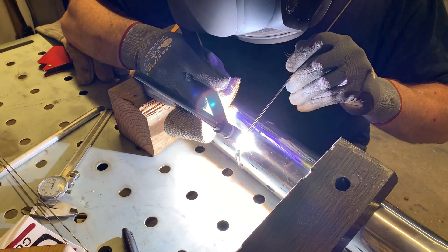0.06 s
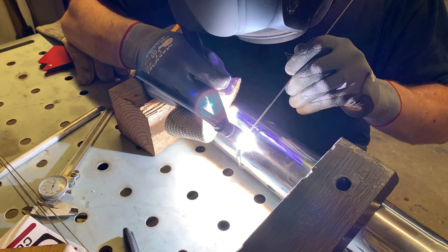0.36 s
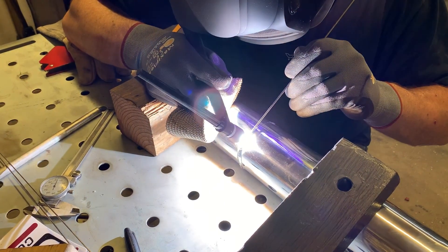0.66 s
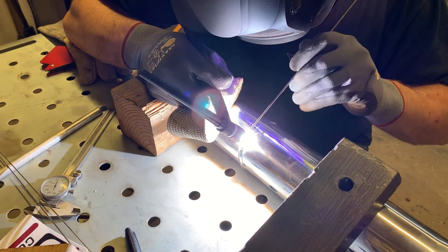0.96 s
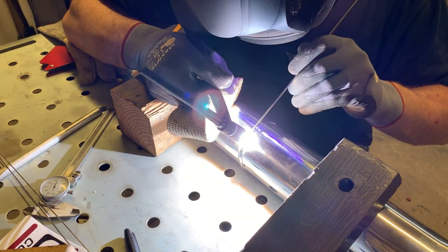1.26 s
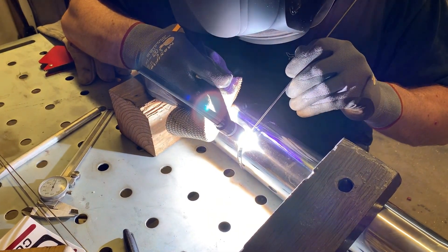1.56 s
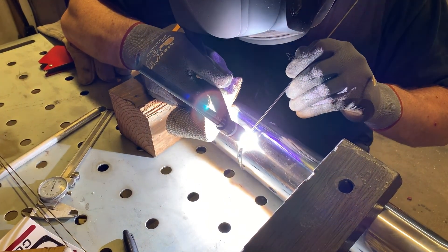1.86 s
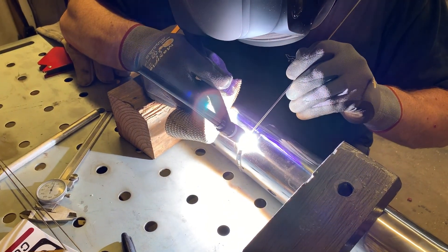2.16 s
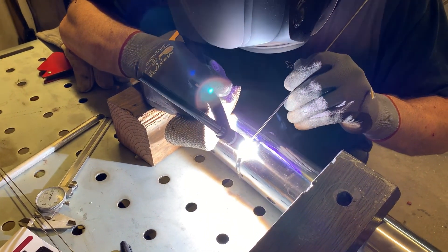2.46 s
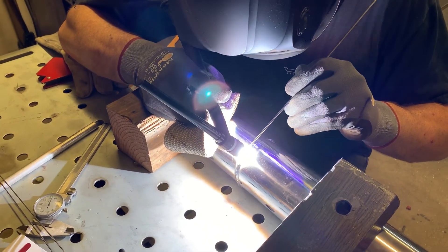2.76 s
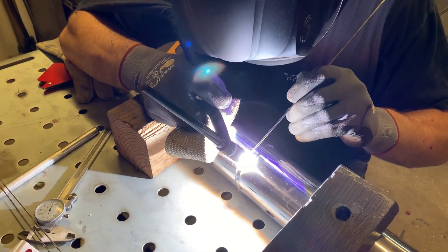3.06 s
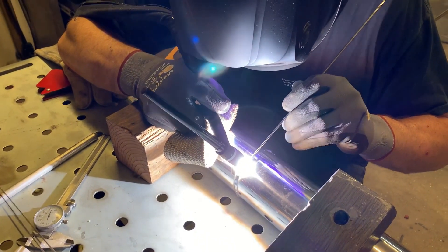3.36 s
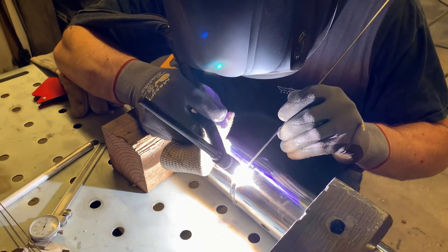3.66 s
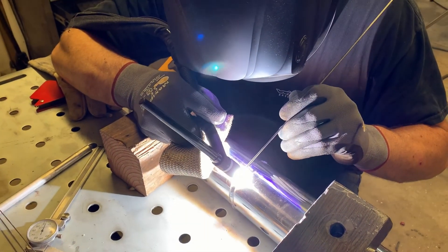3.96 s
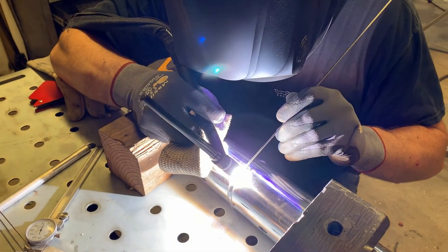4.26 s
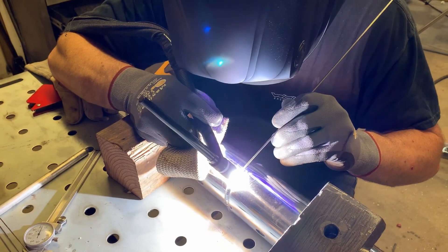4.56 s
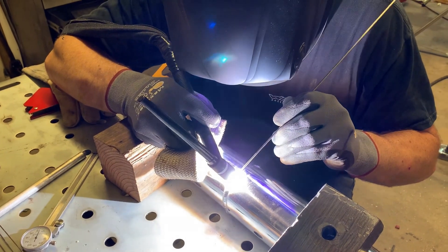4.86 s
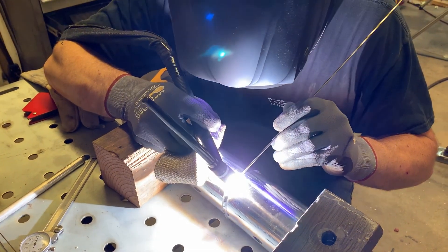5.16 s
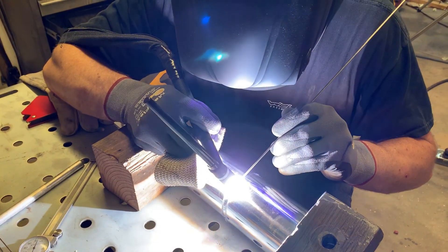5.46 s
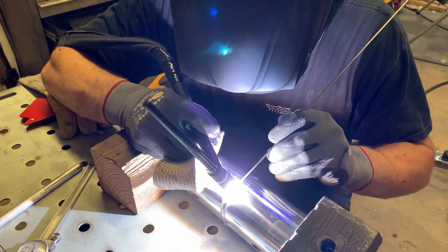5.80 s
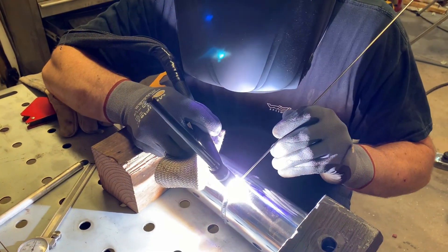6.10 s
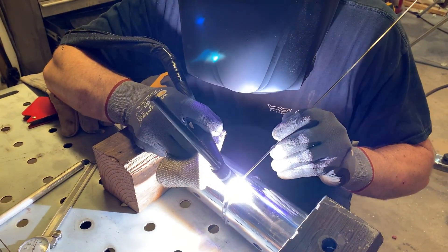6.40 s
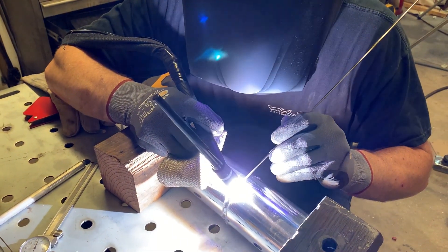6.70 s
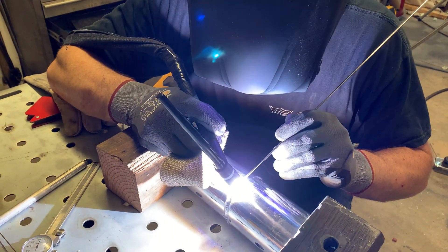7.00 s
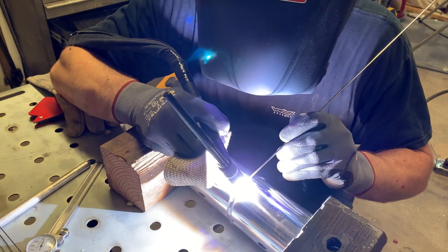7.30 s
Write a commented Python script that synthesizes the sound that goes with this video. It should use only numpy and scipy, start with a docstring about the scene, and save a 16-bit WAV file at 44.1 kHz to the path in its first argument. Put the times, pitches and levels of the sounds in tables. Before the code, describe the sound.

An electric welding arc burns on a metal tube from start to finish, heard close up in a workshop with very little echo. It is a steady-pitched, bright buzz made of very rapid tiny cracks, with a high sizzle on top and a faint gas hiss beneath. The buzz softens briefly about once a second as a filler rod is dabbed in, and gives an occasional sharper spit. Short, low thumps that drop in pitch sputter at about 0.8 seconds, most strongly around 1.5, then in clusters near 2.3 and from 2.9 to 3.3 seconds. From about 4.6 seconds the arc turns smoother and a little softer, losing its raspy edge while the high sizzle stays. At about 6.7 seconds the rasp returns with another cluster of thumps lasting until 7 seconds. One more small thump comes around 7.5 seconds, with the arc still buzzing.

```python
"""At a steel bench in a workshop, an AC TIG arc burns on a metal tube close to a hand-held phone.
The arc re-ignites on every half cycle of the mains: each ignition is a sharp crack, and their periodic
train is heard as a buzz. It softens about once a second as the filler rod is dabbed in. Some ignitions
bring a low thump that falls in pitch. Bench, helmet and workshop reflect the cracks, and shielding gas
hisses underneath."""
import sys
import numpy as np
from scipy import signal
from scipy.fft import rfft, irfft, next_fast_len
from scipy.io import wavfile
from scipy.ndimage import uniform_filter1d

SR = 44100
rng = np.random.default_rng(int(sys.argv[2]) if len(sys.argv) > 2 else 0)


def bounce(signal):
    """Save signal as a 16-bit WAV file at the path given by the first command-line argument."""
    frames = np.transpose(np.atleast_2d(signal))
    limited = np.clip(frames, -1, 1)
    pcm = np.round(limited * 32767).astype(np.int16)
    wavfile.write(sys.argv[1], SR, pcm)


N = 332514
IGNITION_HZ, FIRST_IGNITION_S = 119.878, .00731  # two ignitions per mains cycle

# Broad spectrum of one crack. Each row: frequency in Hz, relative level in dB.
CRACK_SPECTRUM = [(300, -42.5), (2900, -12.5), (3600, -14), (4000, -3.5), (5400, -23), (6200, -9.5),
                  (8300, -4.5), (9400, -4), (10700, 1), (12000, -3.5), (13000, 3), (13600, -2), (14400, -4),
                  (15600, -3.5)]
# Resonances of the gap between cup and tube. Each row: time in seconds, lower rasp resonance in dB
# relative to the upper, sizzle frequency in Hz, relative sizzle level in dB.
GAP_RESONANCES = [(0, -25, 11460, 4), (1.4, -20.5, 11250, -1), (2.1, -19, 10580, 5), (2.8, -4, 10050, 5.5),
                  (3.7, 0, 9980, 4), (5.2, 8.5, 9960, 8), (6.5, 6, 9920, 4), (7.5, 4.5, 10000, 4.5)]
# Drift of the arc along the seam. Each row: time in seconds, then relative levels in dB of the
# treble, of its 4 kHz edge and of its 7 kHz rasp.
ARC_DRIFT = [(0, -27.5, -5.5, -9), (.5, -26, -4.5, -7.5), (1.45, -25, -4, -9), (1.8, -28.5, -4, -7),
             (2.4, -28, -3.5, -8.5), (3.3, -25, -7.5, -12), (3.45, -26.5, -9.5, -9), (3.9, -26, -10.5, -10),
             (4.52, -30, -10, -12), (4.6, -29, -21, -18.5), (5.6, -28.5, -16, -24), (6.58, -25.5, -20, -27),
             (6.7, -27.5, -10, -11.5), (7.54, -25, -21, -10.5)]
# Dabs of the filler rod. Each row: start in seconds, time in the pool in seconds, dip in dB.
ROD_DABS = [(.575, 0.1, 6), (1.52, 0.19, 6), (2.415, .16, 3), (3.365, .13, 4), (3.54, 0.15, 3.5),
            (4.36, 0.11, 1.5), (4.55, 0.075, 3.5), (5.61, 0.14, 3.5), (6.615, 0.048, 3.5),
            (6.84, 0.065, 1.5)]
# Single ignitions that spit. Each row: time in seconds, change of level in dB.
ARC_SPITS = [(.758, -5), (1.717, 5), (3.528, 1.5), (4.062, 3), (4.246, 0), (4.329, 3.5), (4.637, 3),
             (4.663, 5.5), (5.663, 7.5), (5.763, 3.5)]
# Travel of the torch. Each row: time in seconds, position from 0 to 1, buzz gain in dB.
TORCH_TRAVEL = [(0, 0.07, 2.5), (1.4, 0.09, 3), (2.2, 0.2, 2.5), (3.3, 0.2, 2), (3.6, 0.24, -0.5),
                (4.5, 0.2, -2), (4.62, 0.86, -1), (6.6, 1, -4.5), (6.72, 0.86, 0), (7.5, 0.86, 2)]
# Low harmonics of the ignition rate. Each row: harmonic number, relative level in dB at torch
# position 0, the same at position 1.
BUZZ_HARMONICS = [(1, -67, -72), (2, -70.5, -75), (3, -56, -61), (4, -59.5, -55.5), (5, -54, -67.5),
                  (6, -46.5, -59), (7, -51.5, -47), (8, -56.5, -56.5), (9, -43.5, -51), (10, -58.5, -68),
                  (11, -49, -49.5), (12, -56.5, -58.5), (13, -62.5, -55), (14, -82, -51.5),
                  (15, -43.5, -41.5), (16, -43.5, -47.5), (17, -95, -71), (18, -48.5, -47.5),
                  (19, -50.5, -49), (21, -52.5, -51.5), (22, -90, -47), (23, -85, -37.5), (25, -36, -82),
                  (26, -49.5, -36), (27, -65, -46), (29, -31, -33.5), (30, -37, -39)]
# Sputters, a thump outwards and often one back. Each row: time in seconds, relative level in dB,
# half cycles until the rebound (0 for none).
ARC_SPUTTERS = [(.8, 4.5, 1), (.825, -2, 0), (1.217, -8, 0), (1.35, -10, 0), (1.392, -18, 0), (1.5, 5, 1),
                (1.517, 7.5, 1), (1.55, 12, 2), (1.726, -18, 0), (2.251, -12, 3), (2.31, -4.5, 1),
                (2.326, -2.5, 0), (2.351, -3, 1), (2.385, 0, 1), (2.401, 1, 0), (2.477, -22, 0),
                (2.893, -7.5, 2), (2.944, -17, 0), (3.102, -7.5, 1), (3.16, 1.5, 1), (3.185, -4, 0),
                (3.21, -8, 0), (3.311, -11.5, 3), (4.513, -23, 0), (6.689, 5.5, 2), (6.756, 5, 0),
                (6.773, -10, 1), (6.806, 6.5, 0), (6.906, -1, 0), (7.014, -12, 5), (7.49, -5.5, 2)]
# Spectrum of one thump. Each row: frequency in Hz, relative level in dB.
THUMP_SPECTRUM = [(15, -28), (35, -19), (50, -1.5), (68, 0.5), (95, -4.5), (125, -6.5), (170, -7.5),
                  (290, -21), (430, -12.5), (650, -21.5), (1000, -26.5), (2000, -29), (4000, -48),
                  (8000, -50)]
# Group delay of a thump. Each row: frequency in Hz, arrival in milliseconds.
THUMP_GROUP_DELAY = [(30, 18.9), (65, 22.5), (100, 12.2), (140, 7.9), (200, 5.9), (300, 3.65), (500, 1.94),
                     (900, 0.072), (3000, 0.1)]
# Reflections from tube, bench and helmet. Each row: nominal delay in milliseconds, amplitude ratio.
NEAR_REFLECTIONS = [(0.202, 0.19), (0.559, 0.11), (1.1, 0.023), (2.5, 0.33)]
# Shielding gas and workshop air. Each row: frequency in Hz, relative spectral density in dB.
AIR_SPECTRUM = [(20, -118), (38, -101), (58, -85), (100, -100), (200, -92.5), (450, -94), (900, -94.5),
                (1900, -90.5), (2600, -86.5), (4000, -84.5), (7000, -85), (10000, -85), (15500, -112)]
# Phase between the phone's microphone ports. Each row: frequency in Hz, lead of the left in radians.
PORT_PHASE = [(0, 0), (70, .3), (150, 1.1), (280, 1.7), (500, 1.4), (720, .9), (1100, .7), (2400, .7),
              (2800, 2.2), (3600, 2.2), (4200, 1), (6000, 0), (22050, -20.6)]


def cracks(times, scatter_db=1.14, jitter_us=2, fizz=0.29, fizz_ms=1.0, gain_db=29.0, size=512):
    """Source and filter: each ignition, a click with a short fizz, excites the gap under the cup."""
    hz, lead = bins(size), size // 8
    jitter, scatter, rasp_scatter = rng.standard_normal((len(times), 3)).T
    treble_db, edge_db, rasp_db = arc_levels(times)
    lower_db, sizzle_hz, sizzle_db = curve(GAP_RESONANCES, times)
    position, _ = curve(TORCH_TRAVEL, times)
    rasp_db = rasp_db + 8 + 0.74 * rasp_scatter
    power = (undb(over_pitch(CRACK_SPECTRUM, hz)) ** 2
             + resonance(hz, 4230 - 300 * position, 730, edge_db + 8)
             + resonance(hz, 6390, 980, rasp_db + lower_db)
             + resonance(hz, 7270, 1300, rasp_db)
             + resonance(hz, sizzle_hz, 1190, sizzle_db))
    # the click falls between samples, and never quite on time
    late_s = times * SR % 1 / SR + jitter_us * jitter / 1e6
    click = np.exp(-2j * np.pi * hz * late_s[:, None])
    fade = np.exp(-np.arange(size) / SR * 1000 / fizz_ms)
    burst = fizz * rfft(rng.standard_normal((len(times), size)) * fade / np.linalg.norm(fade))
    spectra = (click + burst) * np.sqrt(power) * reflection_comb(times, hz)
    pulses = np.roll(irfft(spectra), lead, axis=1)
    strength = undb(treble_db + gain_db + scatter_db * scatter + per_ignition(ARC_SPITS, times))
    return place(times - lead / SR, pulses * strength[:, None])


def arc_levels(times, attack_s=0.023, release_s=0.033):
    """Damping: the rod lowers the drifting arc's level while in the pool. Gives treble, edge and rasp."""
    treble_db, edge_db, rasp_db = curve(ARC_DRIFT, times)
    for start, hold_s, depth_db in ROD_DABS:
        entering = (times - start) / attack_s
        leaving = 1 - (times - start - hold_s) / release_s
        treble_db = treble_db - depth_db * np.clip(np.minimum(entering, leaving), 0, 1)
    return treble_db, edge_db, rasp_db


def resonance(hz, centre_hz, width_hz, peak_db):
    """A resonator's power response falls with detuning from its centre; one row per ignition."""
    detuning = 2 * (hz - np.reshape(centre_hz, (-1, 1))) / width_hz
    return undb(peak_db)[:, None] ** 2 / (1 + detuning ** 2) ** 2


def buzz(smear_hz=2300, waver_db=1.57, follow_hz=5000, reference_db=-11.5):
    """Fourier series: the periodic arc radiates harmonics; the higher ones follow its strength more."""
    t = np.arange(N) / SR
    position, torch_db = curve(TORCH_TRAVEL, t)
    treble_db, _, _ = arc_levels(t)
    tone = 0
    for harmonic, first_db, last_db in BUZZ_HARMONICS:
        hz = round(harmonic) * IGNITION_HZ
        db = first_db + position * (last_db - first_db) + (treble_db - reference_db) * hz / follow_hz
        smear = hz / smear_hz * rng.standard_normal()  # echoes smear the phase
        tone = tone + undb(db) * np.cos(2 * np.pi * hz * (t - FIRST_IGNITION_S) + smear)
    return np.sqrt(2) * tone * undb(torch_db + waver_db * wander(70))


def thumps(times, gain_db=36.0, phase_rad=2.6, right_db=-10, size=8192):
    """Dispersion: the lows of each thump arrive after its highs, so the pitch sweeps down."""
    hz = bins(size)
    lag = 2 * np.pi * np.cumsum(over_pitch(THUMP_GROUP_DELAY, hz)) / 1000 * hz[1]
    left = undb(over_pitch(THUMP_SPECTRUM, hz) + gain_db) * np.exp(1j * (phase_rad - lag))
    right = left * undb(over_pitch([(400, 0), (820, right_db)], hz))  # duller at the right port
    sweeps = irfft(np.array([left, right]))[:, :size // 2]
    impulses = place(times, sputter_impulses(times)[:, None])
    return signal.fftconvolve(impulses[None], sweeps, axes=1)[:, :N]


def sputter_impulses(times, rebound_db=-1.5, murmur=0.0043):
    """Impulsive excitation: a sputter pushes outwards at an ignition; a rebound has the opposite sign."""
    outward = [(start, undb(db)) for start, db, _ in ARC_SPUTTERS]
    back = [(start + round(wait) / IGNITION_HZ, undb(db + rebound_db))
            for start, db, wait in ARC_SPUTTERS if round(wait)]
    # faint stray pushes while the arc has an edge
    _, edge_db, _ = arc_levels(times)
    chance = rng.standard_normal(len(times))
    stray = murmur * undb(2 * (edge_db - edge_db.max())) * chance * abs(chance)
    return per_ignition(outward, times) - per_ignition(back, times) + stray


def reflection_comb(times, hz, stretch=0.06, tremor=0.031):
    """Interference with near echoes forms a comb that slides as the torch travels and the hand trembles."""
    position, _ = curve(TORCH_TRAVEL, times)
    path_scale = 1 + stretch * (position - .5) + tremor * wander(3.15)[(times * SR).astype(int)]
    return 1 + sum(gain * np.exp(-2j * np.pi * hz * path_scale[:, None] * ms / 1000)
                   for ms, gain in NEAR_REFLECTIONS)


def reverberate(direct, clutter=0.51, clutter_ms=0.93, room=0.13, room_t60_s=0.28):
    """Diffuse reflection: a quick scatter off the tools and a faint workshop tail decay exponentially."""
    t = np.arange(SR // 3) / SR
    near = np.exp(-t * 1000 / clutter_ms)
    far = np.exp(-np.log(1000) * t / room_t60_s)
    envelope = np.hypot(clutter * near / np.linalg.norm(near), room * far / np.linalg.norm(far))
    response = port_noise(len(t)) * envelope
    return direct + signal.fftconvolve(direct[None], response, axes=1)[:, :N]


def gas_and_air(swell_db=1):
    """Broadband noise: shielding gas hisses from the cup over the workshop's low rumble."""
    colour = undb(over_pitch(AIR_SPECTRUM, bins(N))) * np.sqrt(SR / 2)
    hiss = irfft(rfft(port_noise(N)) * colour, N)
    return hiss * undb(swell_db * wander(1.41))


def port_noise(size):
    """Partial coherence: each of the two ports gets a common noise plus one of its own."""
    noise = rng.standard_normal((3, size))
    return noise[0] + noise[1:]


def undb(db):
    """Decibels to amplitude ratio."""
    return 10 ** (np.asarray(db) / 20)


def curve(table, at):
    """Linear interpolation of a table's columns along its first."""
    key, *columns = np.transpose(table)
    return [np.interp(at, key, column) for column in columns]


def over_pitch(table, hz):
    """Linear interpolation on a log-frequency axis."""
    points, values = np.transpose(table)
    return np.interp(np.log(np.maximum(hz, 1)), np.log(points), values)


def bins(size):
    """Frequencies in Hz of a real Fourier transform."""
    return np.fft.rfftfreq(size, 1 / SR)


def wander(rate_hz):
    """Low-pass fluctuation: random steps, smoothed twice."""
    hold = int(SR / rate_hz)
    steps = np.repeat(rng.standard_normal(N // hold + 1), hold)
    return uniform_filter1d(uniform_filter1d(steps, hold), hold)[:N]


def per_ignition(events, times):
    """Synchronisation: each event's value goes to its nearest ignition."""
    values = np.zeros(len(times))
    for start, value in events:
        values[np.argmin(abs(times - start))] += value
    return values


def place(times, sounds):
    """Superposition of short sounds, one a row, at their times."""
    index = (times * SR).astype(int)[:, None] + np.arange(sounds.shape[1])
    return np.bincount(index.ravel(), sounds.ravel(), N)[:N]


def scene():
    """The sources add linearly and reach the phone's two ports with a phase difference."""
    ignitions = np.arange(FIRST_IGNITION_S, N / SR, 1 / IGNITION_HZ)
    left, right = reverberate(cracks(ignitions)) + buzz() + thumps(ignitions) + gas_and_air()
    size = next_fast_len(N + SR // 10)
    lag, = curve(PORT_PHASE, bins(size))
    right = irfft(rfft(right, size) * np.exp(-1j * lag), size)[:N]
    return np.array([left, right])


def record(dry):
    """Saturation and band limiting: the phone rounds the largest swings and cuts the top."""
    ceiling, cutoff_hz = .95, 15900
    rounded = dry / (1 + (dry / ceiling) ** 6) ** (1 / 6)
    return signal.sosfilt(signal.ellip(10, .2, 80, cutoff_hz, fs=SR, output="sos"), rounded)


dry = scene()
out = record(dry)
bounce(out)
```